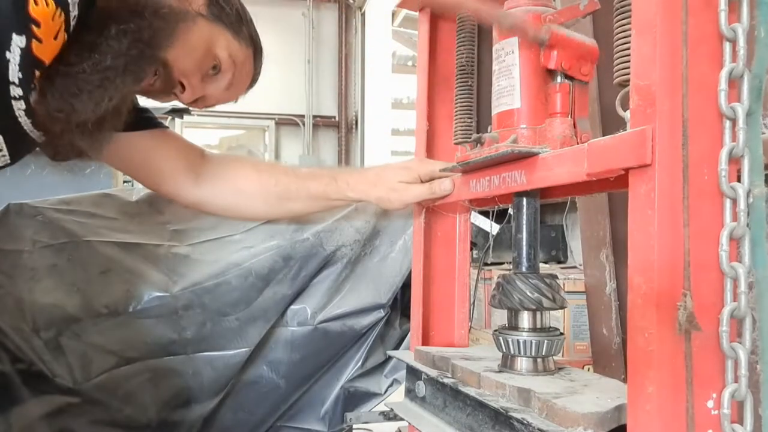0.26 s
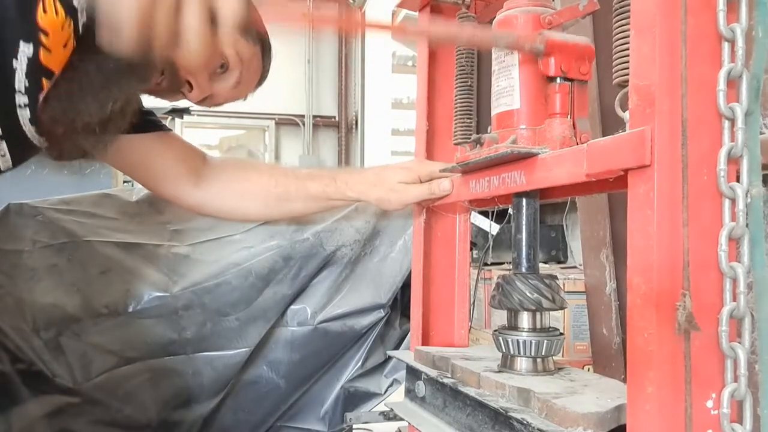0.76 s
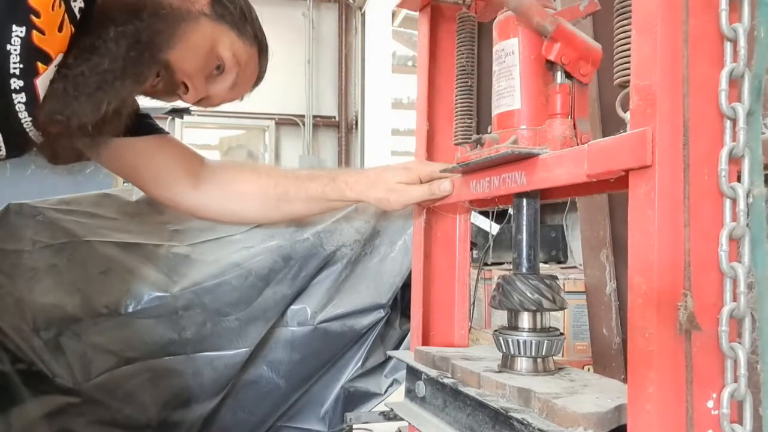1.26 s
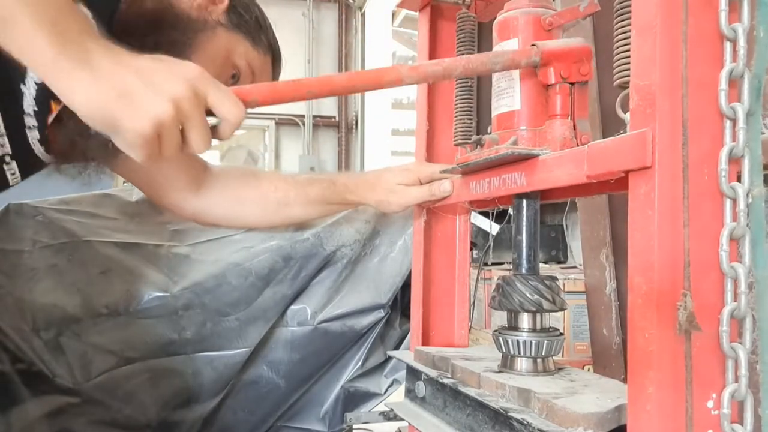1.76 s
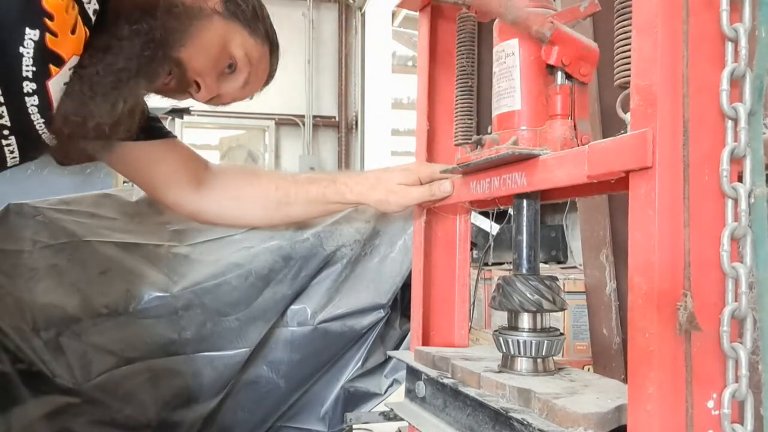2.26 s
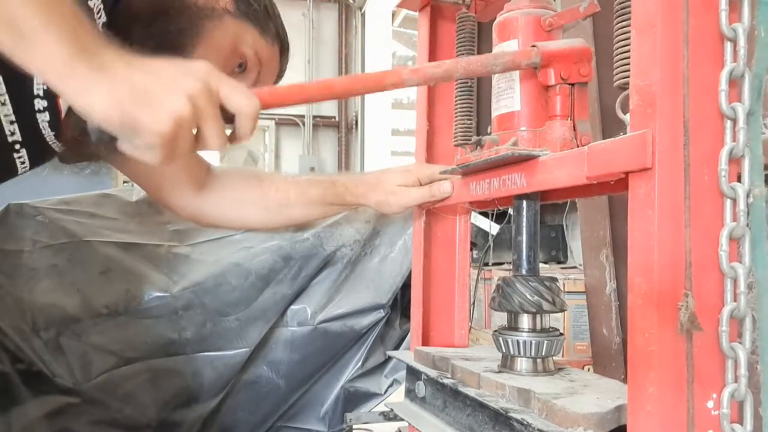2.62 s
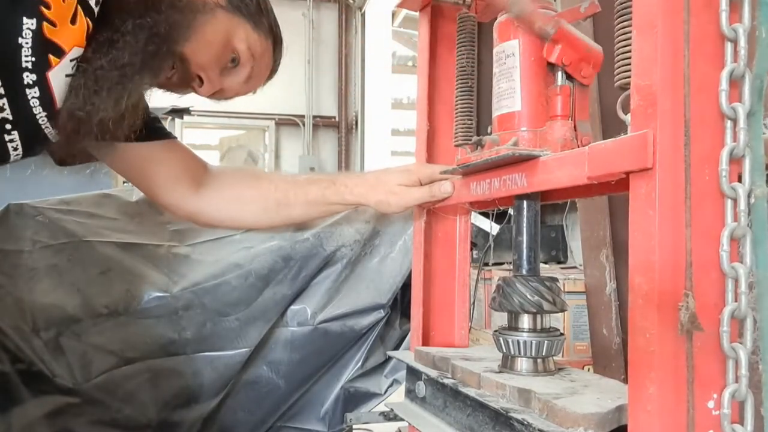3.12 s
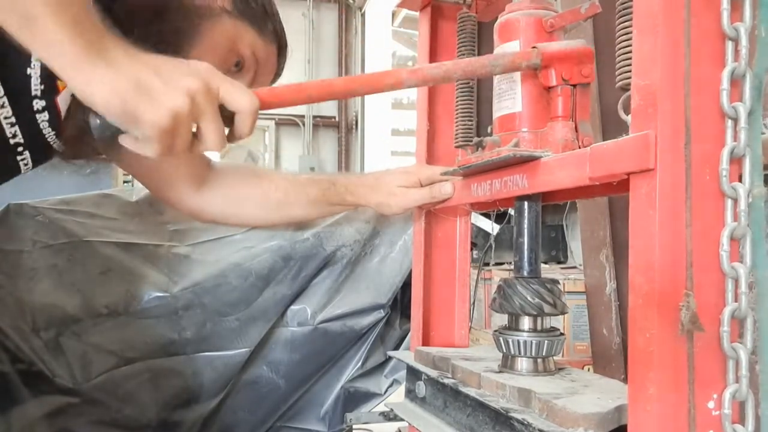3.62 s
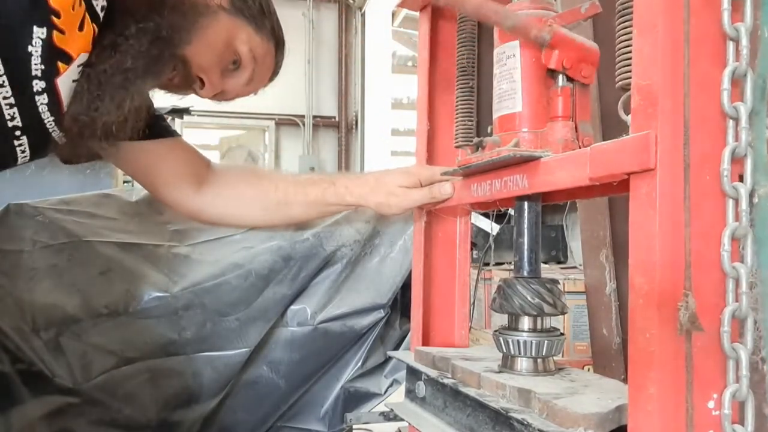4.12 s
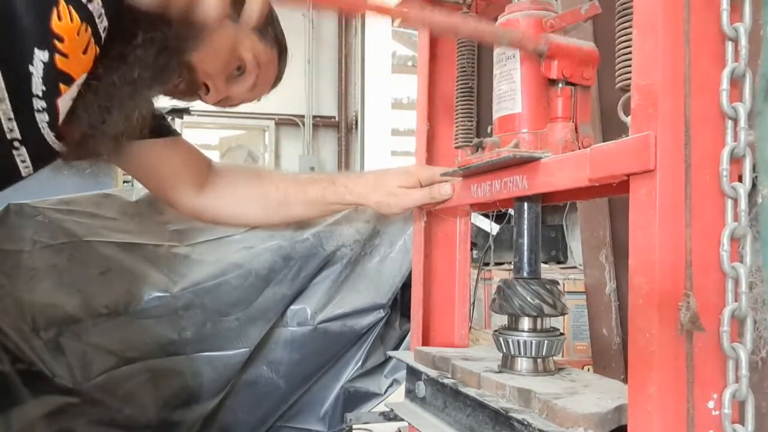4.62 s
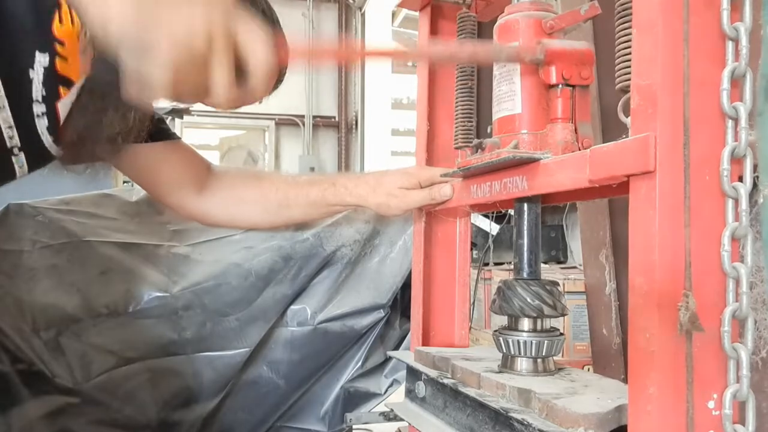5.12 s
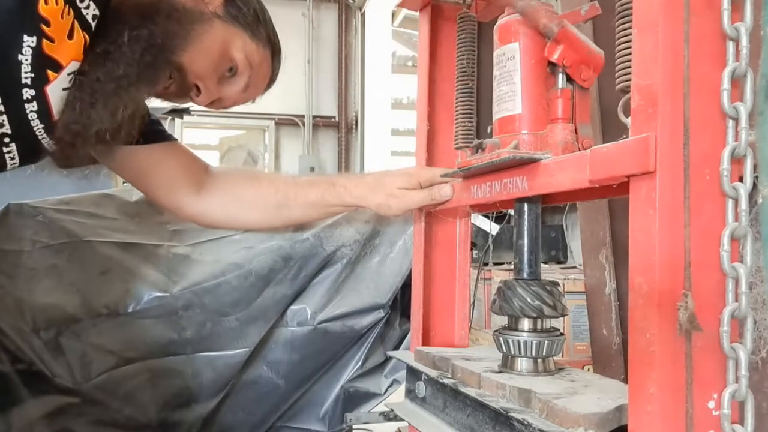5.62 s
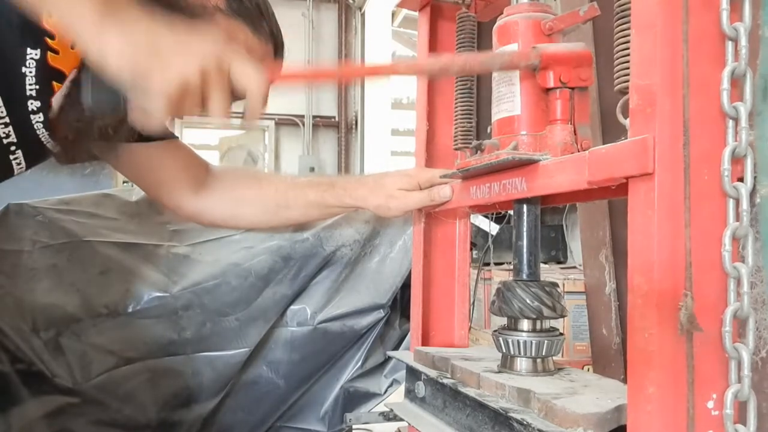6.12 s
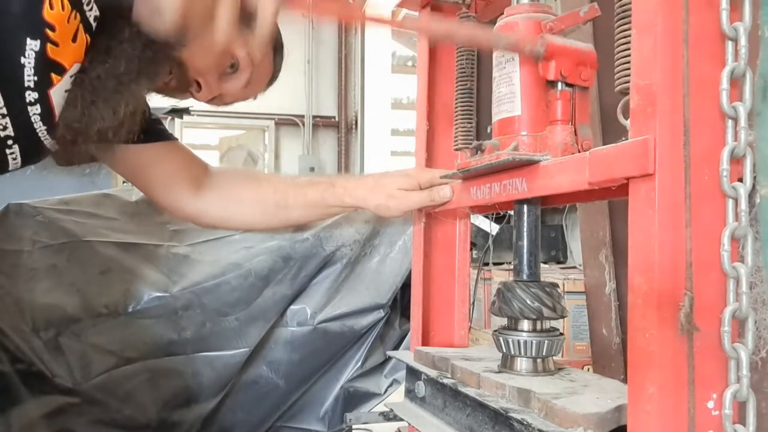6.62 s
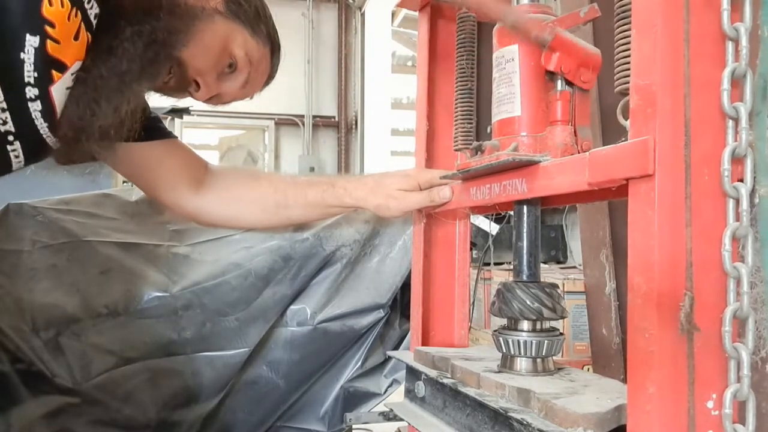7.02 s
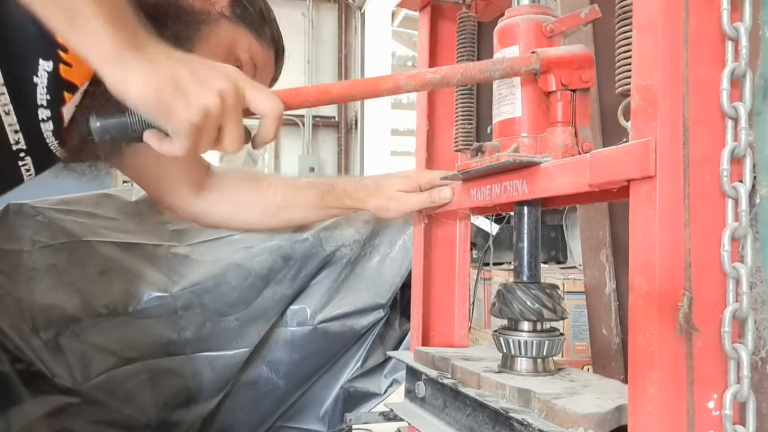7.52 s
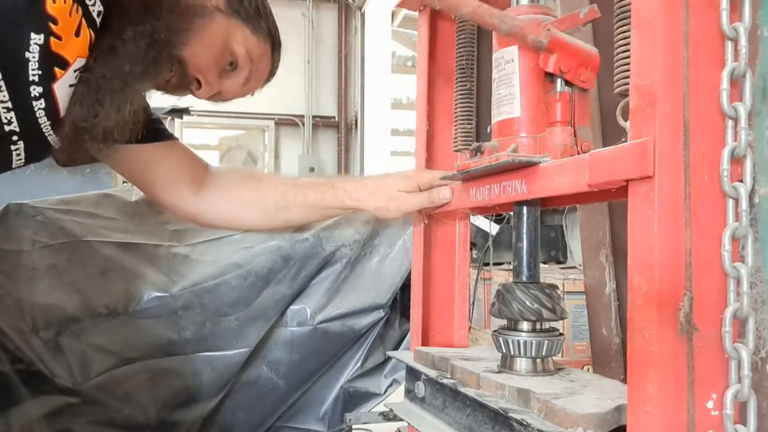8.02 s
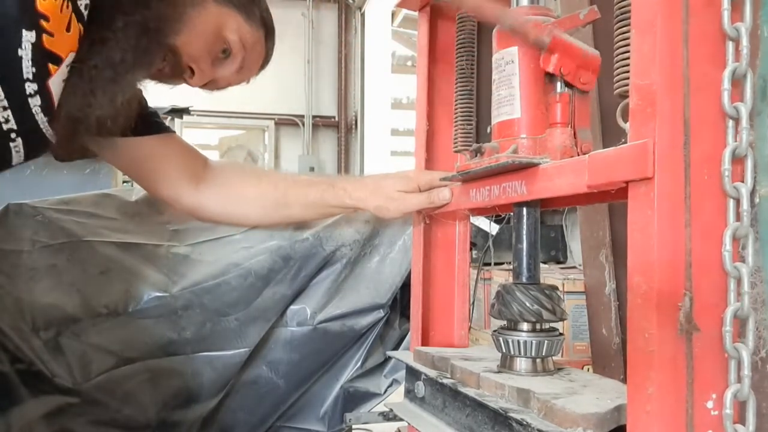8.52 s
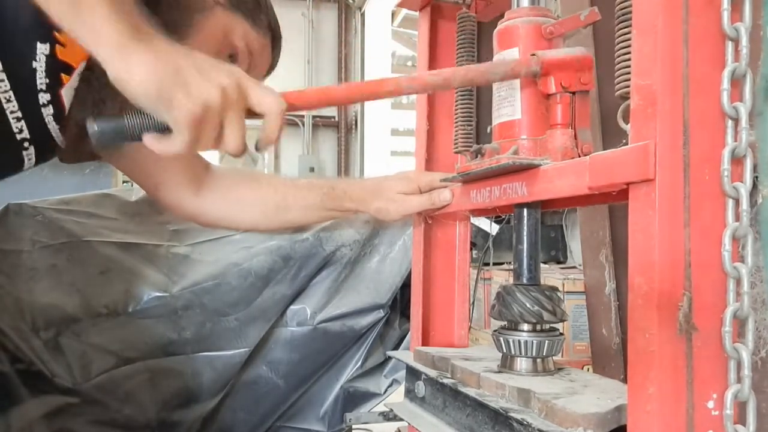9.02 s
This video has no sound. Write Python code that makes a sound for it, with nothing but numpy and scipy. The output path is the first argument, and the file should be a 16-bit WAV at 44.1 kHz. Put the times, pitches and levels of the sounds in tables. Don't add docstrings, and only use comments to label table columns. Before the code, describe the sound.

A hand-pumped shop press knocks and ticks lightly at first, then bangs loudly and regularly as load builds, in a hard-walled workshop.

```python
import sys
import numpy as np
from scipy import signal
from scipy.fft import rfft, irfft, next_fast_len
from scipy.io import wavfile
from scipy.ndimage import uniform_filter1d

SR = 44100
rng = np.random.default_rng(int(sys.argv[2]) if len(sys.argv) > 2 else 0)


def nominal_scale(level):
    x = np.asarray(level, float) / 20
    return 10 ** x


def int16_out(signal):
    q = np.round(np.clip(np.atleast_2d(signal).T, -1, 1) * 32767)
    wavfile.write(sys.argv[1], SR, q.astype(np.int16))


N = 408366
SIZE = next_fast_len(N + 3 * SR // 2)
RING = SR // 3
SEATINGS = 4

# start in seconds, frame peak in dB, thump and clang in dB relative to it.
SLIPS = [(3.553, -15, -5, -1.5), (3.573, -22, 10.5, -0.5), (4.293, -13.5, 3, -2.5), (4.351, -8, -1, -6.5),
         (5.043, -4, -5, -7.5), (5.079, -14, -15, -25), (5.12, -1, -6, -12), (5.187, -4.5, -11, -11),
         (5.841, -3, -7, -12.5), (5.92, -7.5, -24, -13), (5.959, -4.5, -7.5, -7.5),
         (5.992, -15.5, -19, -12.5), (6.592, -5, -13, -9.5), (6.647, -1, -13, -12),
         (6.668, -11, -17, -10.5), (6.714, -7.5, -20, -10.5), (6.755, -1, -14, -10.5),
         (7.365, -1, -17.5, -11), (7.433, -4, -24, -9), (7.457, -8.5, -13, -17), (8.076, -2.5, -18.5, -11),
         (8.163, -6.5, -38, -10.5), (8.225, -4, -34, -10), (8.807, -2, -11, -13.5),
         (8.883, -3.5, -17, -12.5), (8.953, -1, -21, -11)]
# bed, uprights, cross beam and springs, all in dB.
REACH = [(-0.5, 0, 2, -4), (3, -12, -9, 11), (-5, 4, 1.5, 0), (4.5, -4, 1, -5), (3.5, -8, 2.5, -5),
         (0.5, -18, -4, -9), (-3, -3.5, -3, -3), (3, 1.3, -2.5, -11), (-6.5, 2.5, 2, -4), (2, -1.5, .1, -1),
         (-0.5, 1.5, 2.5, -8), (3, 3.5, -5, -3), (2.5, 1, 0.5, -4), (-2.5, -1.5, 1, -7), (-4, -6, -1, 13.5),
         (3.2, -5, -1.5, -6), (-3.5, 2, 0.5, 0.5), (1, -2, 0.5, 4.5), (-0.5, -2, -1.2, -2),
         (-0.5, 1.7, -2.7, -6.5), (0, 3.5, -3.3, 6), (-1, 2.8, -1, 7), (0, 1.5, 0.8, -4),
         (0.2, 0.5, -6.7, -7), (-1.1, 0, -1.1, 2), (-1.5, 1.1, -2.7, -0.5)]
# frequency in Hz, level in dB per Hz.
FRAME = [(35, -54), (60, -14), (217, -16.5), (398, 0.5), (492, -6), (593, -7), (651, -21.5), (749, -0.5),
         (924, -15.5), (1060, -9.5), (2770, -7), (5720, -9), (10000, -9.5), (11800, -10.5), (16000, -18.5)]
# frequency in Hz, T60 in seconds.
FRAME_T60 = [(100, 0.23), (400, 0.16), (1500, 0.34), (5000, 0.28), (14000, 0.012)]
# frequency in Hz, level in dB, T60 in seconds.
FRAME_MODES = [(300.5, -18.5, 0.12), (407.2, -17.5, 0.088), (589, -19, 0.22), (710, -32.5, 0.26),
               (809, -27, 0.26), (865, -29.5, 0.36), (1035, -18.5, 0.044), (4640, -29, 0.081),
               (1570, -27.5, 0.13), (2200, -56, 0.2), (2970, -23, 0.34), (4300, -21.5, 0.2),
               (5076, -16.5, 0.11), (5690, -11.5, 0.13)]
# frequency in Hz, level in dB, T60 in seconds, rise in seconds.
BEAM = [(756, -13, 0.19, 0.0038), (744, -19.5, 0.35, 0.0068), (398, -15, 0.03, 0.0019),
        (297.7, -20.5, 0.088, 0.0036), (178, -18, 0.12, 0.0042), (254, -17, 0.081, 0.0042),
        (343, -15, 0.069, 0.0027)]
# start in seconds, peak in dB, centre in Hz.
CRACKS = [(5.048, 5, 789), (5.124, 14, 754), (5.189, -10, 762), (5.843, 0.5, 1080), (6.599, -16, 760),
          (7.365, -1, 787), (8.076, 3, 750), (8.162, 3, 756), (8.227, 5, 775), (8.81, 8, 730),
          (8.887, 4, 760)]


def frame():
    slip_ms, slip_ms_per_s = 4.54, 0.71
    sizzle_db, sizzle_follows = -15, 0.83
    rows = np.array([(*row, slip_ms + slip_ms_per_s * (row[0] - SLIPS[0][0])) for row in SLIPS])
    start, db, thump_db, clang_db = rows[:, :4].T
    bed_db, upright_db, beam_db, spring_db = np.transpose(REACH)
    steel = body(FRAME, FRAME_T60, FRAME_MODES, crack_db=-15.5, crack_s=0.11)
    bang = strike(steel, rows, [
        (41.2, 257, db + thump_db - 10.5, 2.76, 0.35),
        (199, 513, db + bed_db - 10.5, 2.54, 0.29),
        (667, 1066, db + beam_db - 13.0, 2.263, 0.22),
        (955, 1990, db + upright_db - 11.5, 2.206, 0.28),
        (1480, 5100, db + clang_db - 3.5, 1.217, 0.96),
        (6000, 34000, db + sizzle_follows * clang_db + sizzle_db, .2, 2.23)])
    shakes = np.zeros(N)
    for s, level, burst in zip(start, db + spring_db, contacts(rows, 0.1)):
        add(shakes, s, nominal_scale(level - 13.5) * np.abs(burst))
    beam = notes(np.c_[start, db + beam_db], BEAM[:2])
    bed = notes(np.c_[start, db + bed_db], BEAM[2:])
    cracks = nominal_scale(-9.0) * snaps(CRACKS)
    return lead(1.0) * rfft(bang + springs(shakes) + sway() + thuds(rows) + beam + bed + cracks, SIZE)


SPRING_HZ = (76.5, 79.3, 287, 308, 314, 386, 392, 408, 463, 690, 759, 830, 1164)
# level in dB, T60 in seconds.
SPRINGS = [(-38, 1.26), (-53, 1.1), (-47, 0.74), (-39, 1.3), (-36, 2.3), (-33, 3.7), (-35.5, 3.3),
           (-38.5, 1.2), (-38, 3), (-37, 1.2), (-39, 1.3), (-44, 0.8), (-34, 2)]


def springs(shakes):
    out = 0
    for hz, (db, t60) in zip(SPRING_HZ, SPRINGS):
        r, w = nominal_scale(-60 / (t60 * SR)), 2 * np.pi * hz / SR
        resonator = [0, nominal_scale(db) * np.sin(w)], [1, -2 * r * np.cos(w), r * r]
        out = out + signal.lfilter(*resonator, shakes + 1e-18)
    return out


# start in seconds, level in dB.
SWAYS = [
    (4.267, -33.5),
    (5.201, -24.5),
    (9.05, -27.5),
]


def sway():
    sway_hz, rise_s, t60_s = 78.7, 0.023, 0.93
    out, t = np.zeros(N), np.arange(SR) / SR
    for s, db in SWAYS:
        swell = nominal_scale(db - 60 * t / t60_s) * (1 - np.exp(-t / rise_s))
        add(out, s, swell * np.sin(2 * np.pi * sway_hz * t))
    return out


def thuds(rows):
    thud_hz, t60_s, thud_db = 143.5, 0.031, -5
    out, t = np.zeros(N), np.arange(SR // 5) / SR
    for s, db, thump_db in rows[:, :3]:
        add(out, s, nominal_scale(db + thump_db + thud_db - 60 * t / t60_s) * np.sin(2 * np.pi * thud_hz * t))
    return out


# start in seconds, peak in dB, contact in ms.
KNOCKS = [(0.0257, -33.5, 3.9), (0.198, -24, 1.4), (0.560, -14, 1.7), (0.874, -16.5, 2), (0.896, -31, 5.3),
          (1.403, -15, 2.5), (1.428, -49, 3.8), (1.4906, -33.5, 6), (1.72, -24.5, 3.1), (1.731, -22.5, 1.1),
          (1.9668, -29, 0.29), (2.2836, -21, 1.9), (2.3068, -20, 9.6), (2.372, -25.5, 6.1),
          (2.6363, -22.5, 10.5), (2.679, -29.5, 1.5), (2.877, -27, 1.4), (3.2048, -12.5, 1.16),
          (3.235, -44, 3.9), (3.2761, -21.5, 6.6), (4.137, -13.5, 2.2), (4.9423, -12, 2.5),
          (5.732, -13, 0.51), (5.752, -30, 2.5), (6.517, -14, 2.3), (7.2561, -14.5, 1.64),
          (7.989, -12, 4.3), (8.75, -18, 1.3)]
HEFT = [3, 1, 2, -5.5, -10, -7, 1.8, 3, -5, -7, -8, 1, 2, -4, 2, -3, -2, -2, 3, 2, 3.5, -5, -11.5, 3, -3,
        -6.5, -11, -4]
# frequency in Hz, level in dB per Hz.
SOCKET = [(120, -18.5), (300, -3.5), (550, -8), (815, -2.5), (1150, -5.5), (1480, -4.5), (1950, -6.5),
          (2400, -19.5), (3500, -21.5)]
# frequency in Hz, level in dB, T60 in seconds.
SOCKET_MODES = [(783.5, -8.5, 0.25), (874.4, -8, 0.083), (1240, -21, 0.07), (1356, -13.5, 0.18),
                (1710, -10.5, 0.11), (1980, -10, 0.18)]
# frequency in Hz, level in dB per Hz.
LINK = [(530, -17), (900, -2.5), (1900, -3.5), (2170, 1.5), (2630, -24), (3190, 7.5), (3770, -5.5),
        (5410, -14), (6720, 24.5), (7400, -22), (10000, -2), (12000, -9), (13400, -20), (15000, -12),
        (16000, -14)]
# frequency in Hz, level in dB, T60 in seconds.
LINK_MODES = [(2230, -16, 0.11), (3640, -25, 0.088), (5240, -13.5, 0.047)]
# frequency in Hz, level in dB, T60 in seconds, rise in seconds.
HANDLE = [(1490, -11, 0.2, 0.001), (1540, -20.5, 0.13, 0.001), (839, -16.5, 0.22, 0.0011),
          (952, -9, 0.044, 0.00092), (1104, -18, 0.074, 0.001)]
# start in seconds, peak in dB, centre in Hz.
SNAPS = [(0.1381, -28, 3740), (0.1649, -26, 5200), (0.1974, -3.5, 5240), (0.454, -35.5, 5460),
         (0.5273, -25, 3820), (0.551, -18, 4040), (0.8726, -23, 3210), (0.995, -23, 3270),
         (1.3871, -12, 3370), (1.881, -28, 3730), (1.8993, -25, 3240), (1.9267, -12, 3480),
         (1.967, -7, 3520), (2.2862, -4, 3830), (2.79, -23, 4810), (2.8029, -31, 5240), (2.8465, -29, 3540),
         (2.8789, -13, 3530), (3.711, -28, 3820), (3.7278, -30, 3870), (3.7853, -23, 5080),
         (3.7987, -22, 4730), (4.127, -12, 3780), (4.539, -24, 3890), (4.5584, -23, 5250),
         (4.6134, -17, 3500), (4.6199, -5, 3640), (4.9285, -12, 5210), (5.3722, -12.5, 3830),
         (5.4181, -27, 3750), (5.958, -26, 4260), (6.1636, -13, 3860), (6.1978, -26, 3265),
         (6.5096, -13, 3610), (6.754, -16, 4290), (6.936, -18, 5540), (7.635, -21, 5160),
         (8.4274, -36, 5330), (8.448, -30, 4870)]


def pump():
    knock, tick = np.array(KNOCKS), pins()
    socket = body(SOCKET, [(600, 0.18), (2500, 0.29)], SOCKET_MODES, crack_db=5.0, crack_s=0.00068)
    link_t60 = [(1500, 0.24), (5000, 0.15), (12000, 0.12), (15000, 0.3)]   # (Hz, s)
    link = body(LINK, link_t60, LINK_MODES, crack_db=3.5, crack_s=0.00095)
    knock_db, tick_db = knock[:, 1], tick[:, 1]
    low_db = -13.5 + 0.44 * knock_db
    knocking = strike(socket, knock, [
        (90, 395, low_db - 10.5, 1.55, 0.67),
        (546, 1180, low_db + HEFT - 10.0, 1.07, 0.25),
        (1067, 3700, knock_db - 7, 1.13, 0.52)])
    ticking = strike(link, tick, [
        (767, 3270, tick[:, 4] - 4.5, 1.168, 1.5),
        (2510, 5070, tick_db - 9.0, 1.244, 1.08),
        (6440, 23000, tick_db + tick[:, 2] + 0.5, 1.4, 1.0)])
    struck = knocking + ticking + pin_notes(tick) + notes(knock, HANDLE) + snaps(SNAPS)
    grit = rng.standard_normal(N) ** 3 / 4 * rub()
    path = nominal_scale(5.0) * socket[0] / np.linalg.norm(socket[0, 0])
    path = path + nominal_scale(-21.5) * link[0] / np.linalg.norm(link[0, 0])
    return lead(6.15) * (rfft(struck, SIZE) + rfft(grit, SIZE) * rfft(path, SIZE))


# start in seconds, peak in dB at 3-6.5 kHz, highs in dB relative
# to it, note in Hz. First faint ticks as slack is taken up.
TICKS = [(0.0195, -33.5, -20, 2430), (0.082, -40.5, -15, 3260), (0.5285, -31, -6, 3770),
         (0.689, -56.5, 8, 2940), (0.855, -23, -25, 3670), (0.995, -26, -14, 2230), (1.292, -48, -23, 2440),
         (1.335, -33, -35, 3170), (2.223, -48, -29, 3810), (2.245, -40.5, -6.5, 3040),
         (3.13, -45, -22, 3800), (3.15, -28.5, -9, 3070), (4.0668, -34.5, -49, 2230),
         (4.902, -51, -8, 2400), (4.9074, -32.5, -9, 5640), (5.348, -34, -29, 2360),
         (5.4202, -32, -12, 2180), (5.61, -60, -1, 2540), (5.698, -45, -14, 3300), (5.667, -43, -33, 2280),
         (6.1987, -32.5, -4.5, 3073), (6.48, -33, -16, 2340), (7.2257, -29, -13.5, 3190),
         (7.955, -30, -15, 3640), (8.7235, -38.5, -8.5, 2230), (8.754, -37, -4, 2030),
         (8.452, -39, -18, 2200), (0.192, -21, -17, 4300), (2.629, -49, -16, 3370), (4.612, -21, -36, 3640)]
CLACKS = [(0.197, -12, -18.5, 4700), (0.551, -18, -21, 2940), (0.8725, -10, -2, 3080),
          (1.3874, -11.5, -10.5, 3650), (1.72, -18.5, -14, 3640), (1.9202, -22.5, -12.5, 3500),
          (2.2686, -19, -3, 3600), (2.2867, -22.5, -2.5, 2130), (2.638, -17.5, -15, 3590),
          (2.878, -22.5, -11, 3300), (3.1793, -24, -4, 2100), (4.112, -20.5, -9.5, 4990),
          (4.620, -29.5, 3, 4300), (4.927, -31, -16, 2030), (5.7061, -22, -6.5, 3770),
          (6.5031, -23.5, -17, 3500), (6.935, -22.5, -9, 2390), (9.166, -23.5, -16.5, 2320)]
RATTLES = [(0.136, -38, -12, 2330), (0.165, -30.5, -8, 5550), (0.4535, -37.5, -29, 5200),
           (1.1045, -37.5, -0.5, 4160), (1.883, -32, -13, 3650), (1.898, -22.5, -22, 3200),
           (1.966, -21, -12, 2140), (2.773, -32.5, -25, 3200), (2.8031, -24, -24, 5240),
           (3.712, -46, -19, 3850), (3.728, -24.5, -16, 3180), (3.799, -23, -12, 4920),
           (4.5317, -25.5, -25, 3870), (4.559, -39.5, -10, 3180), (5.3703, -31.5, -5, 3570),
           (6.1593, -23.5, -10.5, 3790), (6.8992, -22, -13, 3700), (7.634, -30.5, -8, 5160),
           (7.6907, -34.5, -8.5, 5240), (8.4133, -32.5, -5.5, 3877), (8.4447, -22, -12, 5090)]
CRUNCHES = [(1.35, -27, -7, 3060), (2.258, -26, -11, 2830), (3.163, -29.5, -11, 5750),
            (4.9169, -24.5, -7, 2480), (5.7149, -25.5, -3.5, 1900), (6.4942, -22, -7, 3230),
            (7.237, -25.5, -5.5, 2030), (7.9643, -25, -5, 3760)]
# low ring in dB, contact in ms.
PIN_KINDS = [
    (-16.5, 2.4),
    (-17, 1.63),
    (-23, 2),
    (-11.5, 7.1),
]


def pins():
    low_follows = 0.53
    out = []
    for rows, (low_db, ms) in zip([TICKS, CLACKS, RATTLES, CRUNCHES], PIN_KINDS):
        for s, db, high_db, hz in rows:
            out.append((s, db, high_db, hz, low_db + low_follows * db, ms))
    return np.array(out)


def pin_notes(rows):
    out, t = np.zeros(N), np.arange(SR // 10) / SR
    for s, db, hz in rows[:, [0, 1, 3]]:
        fade = nominal_scale(db + 1.5 - 60 * t / 0.027) * (1 - np.exp(-t / 0.00022))
        add(out, s, fade * np.sin(2 * np.pi * hz * t))
    return out


# middle in seconds, half length in seconds, level in dB.
DRAGS = [
    (3.5, 0.04, -44.5),
    (6.294, 0.13, -60),
    (7.827, 0.019, -56),
    (8.553, 0.092, -45.5),
    (9.05, 0.19, -40),
]


def rub():
    t = np.arange(N) / SR
    loaded_db = -57 - 39 * np.maximum(since(SLIPS) - 0.037, 0)
    idle_db = -59 - 38 * since(KNOCKS)
    drags = sum(nominal_scale(db) * np.exp(-((t - s) / half_s) ** 2) for s, half_s, db in DRAGS)
    return nominal_scale(loaded_db) + nominal_scale(idle_db) + drags


# the bar touching the socket wall, and small knocks in the frame as it slips. Starts in seconds.
TOUCH_S = (0.001, 0.002, 0.857, 0.858, 0.896, 0.928, 0.997, 1.351, 1.428, 1.429, 1.481, 2.224, 2.268, 2.326,
           2.372, 3.237, 3.31, 3.508, 3.552, 3.574, 4.142, 4.636, 5.205, 5.845, 5.961, 6.637, 6.662, 6.83,
           7.366, 7.685, 7.835, 8.452)
# peak in dB, centre in Hz.
TOUCHES = [(-36, 2700), (-37, 5200), (-22, 770), (-31, 1700), (-18, 2160), (-26, 1640), (-33, 2400),
           (-27, 3200), (-22, 905), (-21, 1550), (-26, 885), (-31, 835), (-24, 790), (-29, 820), (-28, 920),
           (-27, 1700), (-28, 1500), (-35, 805), (-15, 980), (-18.5, 1300), (-24, 1100), (-33, 1300),
           (-12, 820), (-7, 545), (-10, 740), (-12, 710), (-13, 800), (-29, 1185), (-13, 580), (-38, 1355),
           (-34, 860), (-24, 2540)]


def taps():
    return lead(4.4) * rfft(snaps(np.c_[TOUCH_S, TOUCHES], t60=0.2, octaves=0.15), SIZE)


# frequency in Hz, T60 in seconds.
SHOP_T60 = [(150, 0.73), (700, 0.88), (2500, 0.56), (6000, 0.58), (14000, 0.51)]


def workshop():
    colour = [(40, 15.0), (1000, -3.5), (5000, 0.5), (15000, 3.0)]   # (Hz, dB)
    tail = stereo_bands(SR, colour, SHOP_T60)[0]
    tail = tail * (1 - np.exp(-np.arange(SR) / SR / 0.0012))
    return 1 + nominal_scale(-12.0) * rfft(tail / np.linalg.norm(tail[0]), SIZE)


# frequency in Hz, level in dB per Hz.
HUM = [(15, -41), (25, -3), (76, 1.5), (134, 2), (285, -5.5), (427, -6.5), (607, -14), (659, -13),
       (2000, -35), (2350, -47), (2760, -52), (2990, -35), (5430, -46), (6740, -36), (16000, -44.5)]
# frequency in Hz, width in Hz, level in dB.
FAN = [
    (64, 26.5, 11.5),
    (121, 14, 2.5),
    (261.5, 9.7, 10),
    (308.6, 39, 7),
]


def background():
    hz = np.maximum(np.arange(SIZE // 2 + 1) * SR / SIZE, 1)
    power = nominal_scale(2 * at_hz(HUM, hz))
    for centre, width, db in FAN:
        power = power + nominal_scale(2 * db) / (1 + (2 * (hz - centre) / width) ** 4)
    mid, side = rfft(rng.standard_normal((2, SIZE))) * np.sqrt(power)
    hum = irfft(spread(mid, side, hz) * lead(9.1), SIZE)[:, :N]
    return nominal_scale(-37.5) * hum / np.sqrt(np.mean(hum ** 2) + 1e-20)


def body(spectrum, t60s, modes, crack_db, crack_s):
    thicket = stereo_bands(RING, spectrum, t60s, count=SEATINGS)
    thicket = thicket * (1 + nominal_scale(crack_db) * np.exp(-np.arange(RING) / SR / crack_s))
    steady = np.array([rings(modes, spread_db=6.0) for _ in range(SEATINGS)])
    return thicket / np.sqrt(np.mean(thicket[..., :400] ** 2)) / 2 + steady


def rings(modes, spread_db):
    t, out = np.arange(RING) / SR, 0
    phases = rng.normal(0, .4, (len(modes), 2, 1))
    luck_db = rng.normal(0, spread_db, len(modes))
    for (hz, db, t60), phase, more_db in zip(modes, phases, luck_db):
        seated_hz = hz * (1 + 0.012 * phase[0])
        fade = nominal_scale(db + more_db - 60 * t / min(t60, 0.3))
        out = out + fade * np.sin(2 * np.pi * seated_hz * t + phase)
    return out


def stereo_bands(size, spectrum, t60s, count=1):
    out, edges, t = 0, 25 * 2 ** (np.arange(29) / 3), np.arange(size) / SR
    white = rng.standard_normal((2, 2, count, 1, size))
    for k, (low, high) in enumerate(zip(edges, edges[1:])):
        hz = np.sqrt(low * high)
        if spectrum[0][0] / 2 < hz < spectrum[-1][0] * 2:
            t60 = at_hz(t60s, hz)
            fade = nominal_scale(at_hz(spectrum, hz) - 60 * t / t60) / np.sqrt(t60)
            mid, side = band(white[k % 2] * fade, low, high)
            out = out + spread(mid, side, hz)
    return out


# frequency in Hz, likeness from 0 to 1.
LIKENESS = [(50, 0.99), (300, 0.96), (700, 0.79), (1500, 0.22), (5000, 0.029), (14000, 0.12)]


def spread(mid, side, hz):
    alike = np.clip(at_hz(LIKENESS, hz), 0, 1)
    return np.sqrt(1 + alike) * mid + np.sqrt(1 - alike) * side * [[1], [-1]]


def contacts(rows, stretch):
    t_ms = np.arange(3000) / SR * 1000
    tau_ms = np.maximum(stretch * rows[:, -1:], .2)
    bursts = rng.standard_normal((len(rows), 3000)) ** 3
    bursts = bursts * (1 - np.exp(-t_ms / (0.36 * tau_ms))) * np.exp(-t_ms / tau_ms)
    return bursts / np.linalg.norm(bursts, axis=1, keepdims=True)


def strike(responses, rows, zones):
    out, size = np.zeros((2, N)), next_fast_len(RING + 3000)
    for low_hz, high_hz, level_db, early_ms, stretch in zones:
        parts = rfft(band(responses, low_hz, high_hz), size)
        for k, burst in enumerate(rfft(contacts(rows, stretch), size)):
            sound = irfft(parts[k % SEATINGS] * burst, size)
            loudest = uniform_filter1d(np.mean(sound[:, :4000] ** 2, axis=0), size=500).max()
            add(out, rows[k, 0] - early_ms / 1000, nominal_scale(level_db[k]) * sound / np.sqrt(loudest))
    return out


def notes(rows, modes):
    out, t = np.zeros(N), np.arange(RING) / SR
    luck = rng.standard_normal((len(rows), len(modes), 2))
    for (s, db), chances in zip(rows[:, :2], luck):
        for (hz, level, t60, rise), (a, b) in zip(modes, chances):
            fade = nominal_scale(db + level + 2.7 * a - 60 * t / t60) * (1 - np.exp(-t / rise))
            add(out, s, fade * np.sin(2 * np.pi * hz * (1 + 0.0063 * b) * t))
    return out


def snaps(rows, t60=0.016, octaves=0.6):
    out, t = np.zeros((2, N)), np.arange(SR // 25) / SR
    noise = rng.standard_normal((len(rows), 2, len(t))) * nominal_scale(-60 * t / t60)
    for (s, db, hz), (mid, side) in zip(rows, noise):
        snap = band(mid + 0.5 * side * [[1], [-1]], hz / 2 ** octaves, hz * 2 ** octaves)
        add(out, max(s - 0.0005, 0), nominal_scale(db - 4.5) * snap / np.abs(snap.mean(axis=0)).max())
    return out


def since(rows):
    t, s = np.arange(N) / SR, np.append(-1, np.array(rows)[:, 0])
    return t - s[np.searchsorted(s, t, side="right") - 1]


def lead(samples):
    return np.exp(-2j * np.pi * np.arange(SIZE // 2 + 1) / SIZE * np.array([[0], [samples]]))


def add(track, s, sound):
    at = round(s * SR)
    track[..., at:at + sound.shape[-1]] += sound[..., :track.shape[-1] - at]


def band(x, low_hz, high_hz):
    edges = [low_hz, min(high_hz, .45 * SR)]
    return signal.sosfilt(signal.butter(2, edges, "band", fs=SR, output="sos"), x)


def at_hz(points, hz):
    table_hz, values = np.transpose(points)
    return np.interp(np.log(hz), np.log(table_hz), values)


def scene():
    press = frame() + pump() + taps()
    return irfft(press * workshop(), SIZE)[:, :N] + background()


def roll_off(x):
    return signal.sosfilt(signal.butter(12, 16000, fs=SR, output="sos"), x)


# frequency in Hz, left minus right in dB.
PORTS = [(60, -1.5), (110, 4), (200, -1.5), (380, 3), (700, 0), (1290, 0), (2380, -4), (4400, -5.5),
         (8120, 7.5), (15000, -7.5)]


def record(dry):
    bass_cut_hz, top_cut_hz = 56, 16650
    hz = np.maximum(np.arange(SIZE // 2 + 1) * SR / SIZE, 20)
    ports = nominal_scale(at_hz(PORTS, hz) / 2 * np.array([[1], [-1]]))
    bass_cut = 1 / np.sqrt(1 + (bass_cut_hz / hz) ** 6)
    x = irfft(rfft(dry, SIZE) * ports * bass_cut, SIZE)[:, :N]
    overloaded = np.clip(x, -.9, .9)
    mix = signal.sosfilt(signal.cheby2(14, 75, top_cut_hz, fs=SR, output="sos"), overloaded)
    return roll_off(mix)


dry = scene()
out = record(dry)
int16_out(out)
```